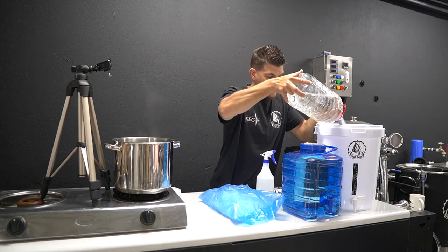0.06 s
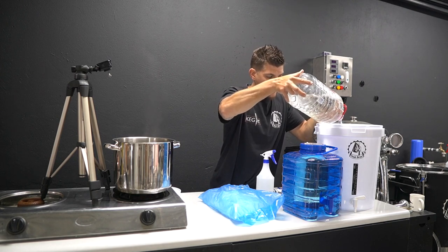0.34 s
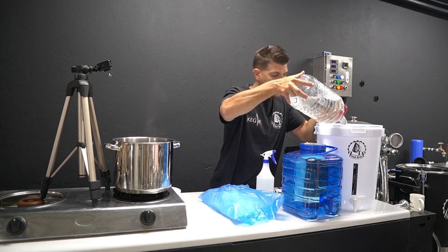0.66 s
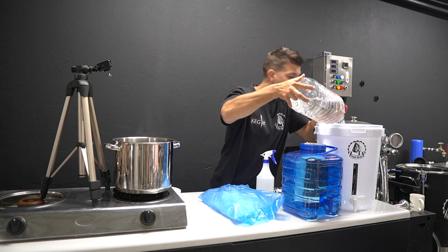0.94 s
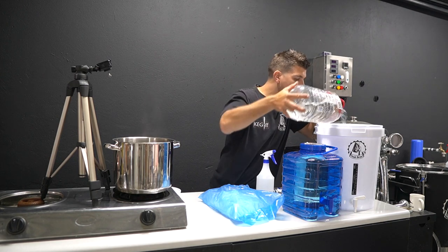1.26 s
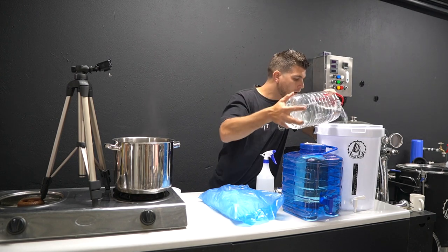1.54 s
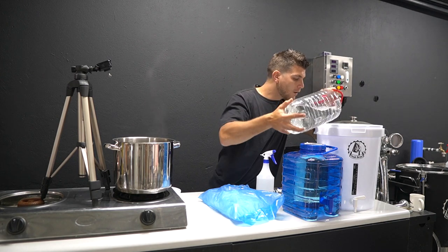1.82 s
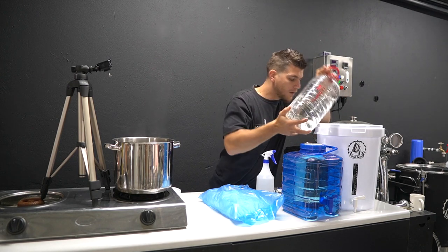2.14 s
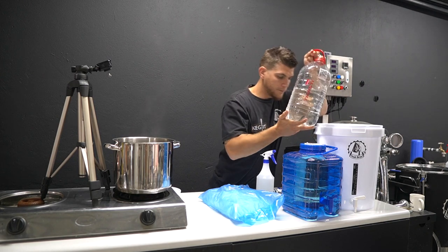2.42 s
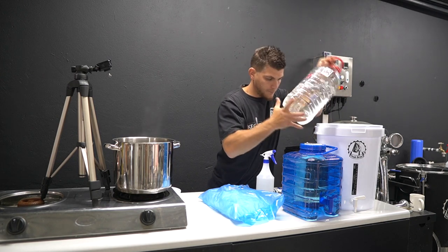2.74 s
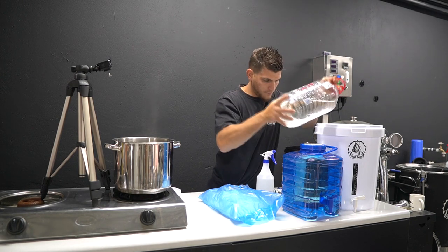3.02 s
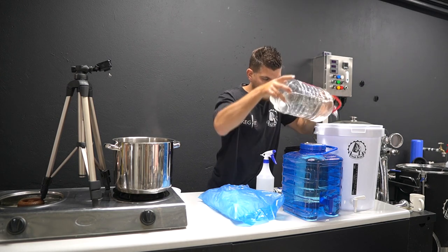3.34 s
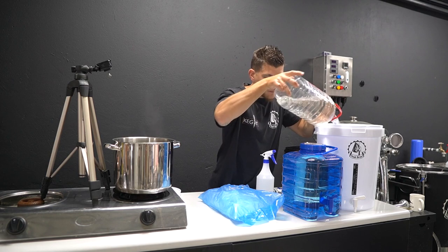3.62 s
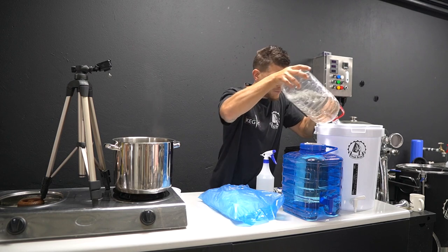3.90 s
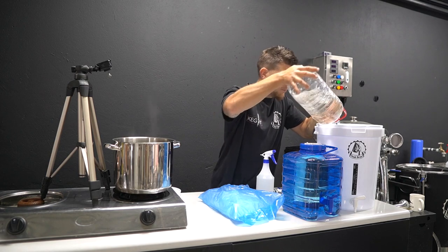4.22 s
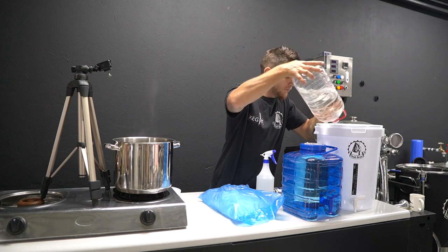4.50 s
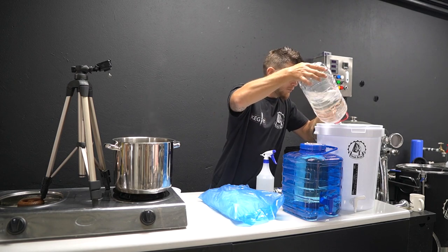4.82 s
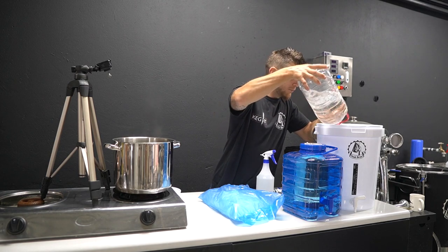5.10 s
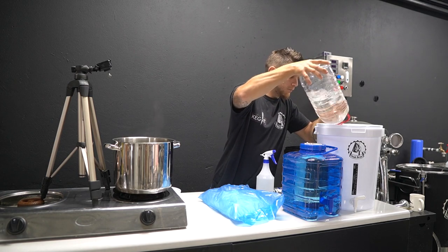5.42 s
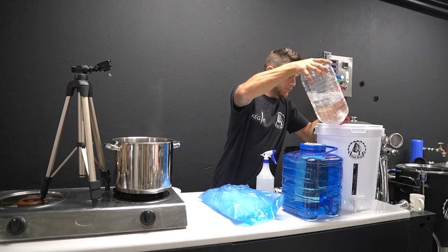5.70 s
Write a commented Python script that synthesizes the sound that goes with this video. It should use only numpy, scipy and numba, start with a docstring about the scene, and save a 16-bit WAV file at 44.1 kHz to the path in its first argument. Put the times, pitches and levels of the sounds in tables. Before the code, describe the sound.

Water pours from the start out of a big thin plastic bottle into a plastic bucket, in about five surges a second, with hollow glugs, bubbling, small plinks and crisp spatter. At 1.6 seconds the bottle wall buckles with a loud, crinkly pop, and the stream stops by about 2 seconds. In the pause, water slops inside the bottle with soft hollow thumps, the clearest slosh coming near 3 seconds. At 3.7 seconds a bright patter of drops and another loud pop open the second pour. The plastic cracks sharply again near 4.9 seconds, and the glugging and splashing continue to the end, near 5.7 seconds. The level dips briefly after each pop. The microphone is near the bucket in a hard-walled room with a short echo. The sound is on the left, over steady low mains hum and faint hiss.

```python
"""A hard-walled room, one microphone near a plastic bucket, heard on the left over mains hum and hiss.
Water pours at once from a big thin plastic bottle, in surges that glug, bubble and spatter. At 1.6 s the
bottle wall buckles with a loud pop; the stream stops and the water slops back inside the bottle.
At 3.7 s a patter of drops and another pop open the second pour, and near 4.9 s the wall cracks again.
A limiter ducks after each pop."""
import sys
import numpy as np
from scipy import signal
from scipy.fft import rfft, irfft
from scipy.io import wavfile
from scipy.ndimage import minimum_filter1d
from numba import njit

SR = 44100
rng = np.random.default_rng(int(sys.argv[2]) if len(sys.argv) > 2 else 0)


def bounce(signal):
    """Save signal as a 16-bit WAV file at the path given by the first command-line argument."""
    frames = np.transpose(np.atleast_2d(signal))
    limited = np.clip(frames, -1, 1)
    pcm = np.round(limited * 32767).astype(np.int16)
    wavfile.write(sys.argv[1], SR, pcm)


N = 253575
TIME, FREQS = np.arange(N) / SR, np.fft.rfftfreq(N, 1 / SR)


def gain_of(db):
    """Decibels to a factor."""
    return 10 ** (np.asarray(db) / 20)


def unit_rms(x):
    """Scales to rms 1."""
    return x / np.sqrt(np.mean(x ** 2) + 1e-20)


def curve(points, hz=FREQS):
    """Joins (Hz, value) points along a log-frequency axis."""
    point_hz, value = np.transpose(points)
    return np.interp(np.log(hz + 1), np.log(point_hz + 1), value)


def add(mix, s, sound):
    """Mixes a sound in at s seconds."""
    part = mix[max(round(s * SR), 0):][:len(sound)]
    part += sound[:len(part)]


def resonances(peaks):
    """Resonance humps in dB over all frequencies."""
    return sum(db / (1 + (2 * (FREQS - hz) / width) ** 2) for hz, width, db in peaks)


def colour(x, db, size=8192):
    """Causal filter with the given dB response: it rings after a click, never before."""
    coarse_db = np.interp(np.fft.rfftfreq(size, 1 / SR), FREQS, np.maximum(db, -100))
    cepstrum = irfft(np.log(gain_of(coarse_db)))
    cepstrum[1:size // 2] *= 2
    cepstrum[size // 2 + 1:] = 0
    return signal.oaconvolve(x, irfft(np.exp(rfft(cepstrum))))[:len(x)]


def lowpass(x, hz, order=2):
    """Dulls the sound above hz."""
    return signal.lfilter(*signal.butter(order, min(hz, SR / 2 - 1), fs=SR), x)


def hump(age, rise_s, fade_s):
    """Envelope that swells smoothly to its peak at age 0, then dies away."""
    return np.exp(-np.where(age < 0, (age / rise_s) ** 2, age / fade_s))


def burst(swell_s, fade_s):
    """Half-second envelope of a splash: a quick swell and an exponential fade."""
    t = np.arange(SR // 2) / SR
    return (1 - np.exp(-t / swell_s)) * np.exp(-t / fade_s)


def bursts(grains, spectrum, rows, swell_s, fade_s):
    """Coloured grains let through in one burst for each (s, dB) row."""
    gate = np.zeros(N)
    for s, db in rows:
        add(gate, s, gain_of(db) * burst(swell_s, fade_s))
    return gate * unit_rms(colour(grains, curve(spectrum)))


# Hum on the microphone line. Each row: multiple of the mains frequency, level in dB.
HUM_HARMONICS = [(1, -13), (2, -54), (3, -52.5), (5, -45.5), (7, -54)]
# The hiss under it. Each row: frequency in Hz, relative level in dB.
HISS_COLOUR = [(47, -33), (80, -22), (109, -61), (197, -28.5), (252, -34), (300, -31.5), (343, -42.5),
               (400, -31.5), (1950, -40), (4410, -40.5), (15500, -60.5)]

def hum_and_hiss(mains_hz=50.083, hiss_db=-43):
    """Mains hum over a faint even hiss, there from the start."""
    hum = sum(gain_of(db) * np.cos(2 * np.pi * k * mains_hz * TIME + k) for k, db in HUM_HARMONICS)
    hiss = unit_rms(colour(rng.standard_normal(N), curve(HISS_COLOUR)))
    return hum + gain_of(hiss_db) * hiss


# The two pours. Each row: start and end in seconds, steady flow in dB, sag in dB per second.
POURS = [(-0.1, 1.872, -34, 0.26), (3.707, 5.8, -30, 2)]

def stream(linger_s, open_db_per_s=468, close_db_per_s=85):
    """The steady stream opens fast, sags as the bottle empties and thins out when it is raised."""
    strength = np.zeros(N)
    for start, end, db, sag in POURS:
        opening = open_db_per_s * np.maximum(start - TIME, 0)
        closing = close_db_per_s * np.maximum(TIME - end - linger_s, 0)
        strength += gain_of(db - sag * (TIME - start) - opening - closing)
    return strength


# Surges at the neck, about five a second. Each row: time in seconds, then gulp, bubbling and spray in dB.
SURGES = [(0.023, -34.5, -32, -28.5), (0.272, -40.5, -26.5, -22.5), (0.453, -38, -27, -27),
          (0.674, -40, -27.5, -29.5), (0.894, -34.5, -27, -26), (1.105, -36.5, -24.5, -24.5),
          (1.277, -40.5, -36, -31), (1.473, -43, -30.5, -24.5), (1.781, -33, -48, -30),
          (3.745, -23, -26.5, -24), (3.82, -31.5, -32, -47), (3.91, -35, -34, -36), (4.018, -43, -26, -28),
          (4.125, -34, -30.5, -39), (4.342, -56, -52, -28.5), (4.451, -55, -29.5, -62),
          (4.555, -43, -27, -35), (4.638, -35, -34, -28.5), (4.904, -40, -24.5, -19),
          (5.049, -48, -28, -30.5), (5.25, -40, -26.5, -28), (5.598, -61, -29, -32),
          (5.725, -26, -27.5, -35)]

def flow(response, column, neck_full_db=-49.5):
    """Drive of one part of the pour: the steady stream plus surges, which need a filled neck."""
    lag_s, rise_s, fade_s, steady_db, surge_db, linger_s = response
    steady = stream(linger_s)
    power = (gain_of(steady_db) * steady) ** 2
    for row in SURGES:
        power += (gain_of(surge_db + row[column]) * hump(TIME - row[0] - lag_s, rise_s, fade_s)) ** 2
    return np.sqrt(power) * np.tanh(steady / gain_of(neck_full_db))


def bubble(hz, cycles, rise):
    """A trapped air pocket rings, rising in pitch as it nears the surface."""
    age = np.arange(int(5 * cycles * SR / hz)) * hz / (SR * cycles)  # in decay times
    return np.exp(-age) * np.sin(2 * np.pi * cycles * age * (1 + rise * age / 2))


def bubbles(low_hz, high_hz, cycles, rise, spread_db, count):
    """A swarm of bubbles of all sizes, a few louder than the rest."""
    swarm = np.zeros(N)
    for when, pitch, ring, loudness in rng.random((count, 4)):
        hz = low_hz * (high_hz / low_hz) ** pitch
        strength = hz * gain_of(-spread_db * np.log(loudness + 0.08))
        add(swarm, when * N / SR, strength * bubble(hz, cycles * (.5 + ring), rise))
    return unit_rms(swarm)


def droplets(per_s, spread_db):
    """Ticks of drops landing at random."""
    size = gain_of(spread_db * np.minimum(rng.exponential(1, N), 5))
    return unit_rms(size * rng.choice([-1, 1], N) * (rng.random(N) < per_s / SR))


def churn(per_s, depth_db):
    """The stream lands in uneven lumps."""
    lumps = rng.standard_normal(1000)
    return gain_of(depth_db * np.interp(TIME * per_s, np.arange(len(lumps)), lumps))


# The three parts of the pour, heard by the bucket. Each row: frequency in Hz, relative level in dB.
GULP_COLOUR = [(65, -16), (110, -6.5), (183, -5.5), (274, -15), (376, -19), (511, -4), (569, -6.5),
               (689, -10.5), (749, -0.5), (800, -10.5), (1040, -27.5), (1760, -120)]
BUBBLING_COLOUR = [(380, -49), (650, -4.5), (900, -6), (1150, -2), (1500, 1), (2000, -4), (2400, -0.5),
                   (3600, -4), (4700, -29), (8000, -100)]
SPRAY_COLOUR = [(1880, -13.5), (3200, -7.5), (4720, -1), (6800, -7), (10800, -22), (14600, -33.5),
                (15500, -46)]
# How each part follows the flow. Each lists: lag, rise and fade of a surge in seconds,
# steady share and surge share in dB, lingering after the pour in seconds.
GULP_RESPONSE = (0.04, 0.08, 0.0457, -8, 4.5, 0.34)
BUBBLING_RESPONSE = (0.037, 0.078, 0.066, 6.5, 5.96, 0.0317)
SPRAY_RESPONSE = (0.049, 0.082, 0.049, 7.6, 4.3, 0.049)
# The air ringing in the bucket. Each row: frequency in Hz, width in Hz, lift in dB.
BUCKET_RESONANCES = [(198, 24, 3.5), (517, 31, 1), (685, 62, -3), (919, 64, 8.5), (1960, 133, 7),
                     (3780, 420, 3)]

def pour():
    """Big air pockets gulp, middling bubbles chatter and drops spray, all inside the ringing bucket."""
    gulp = bubbles(low_hz=130, high_hz=850, cycles=1.7, rise=.04, spread_db=1, count=5000)
    bubbling = bubbles(low_hz=600, high_hz=4000, cycles=5, rise=.035, spread_db=3, count=6500)
    spray = bubbles(low_hz=2800, high_hz=11000, cycles=8, rise=.035, spread_db=3.3, count=6000)
    bubbling += gain_of(-0.5) * droplets(per_s=2900, spread_db=4)
    spray += gain_of(5) * droplets(per_s=4000, spread_db=-1)
    lumps = churn(per_s=55, depth_db=1.42)
    bucket_db = resonances(BUCKET_RESONANCES)
    parts = [(gulp, GULP_COLOUR, flow(GULP_RESPONSE, column=1)),
             (bubbling, BUBBLING_COLOUR, flow(BUBBLING_RESPONSE, column=2)),
             (spray, SPRAY_COLOUR, flow(SPRAY_RESPONSE, column=3))]
    return sum(drive * unit_rms(lumps * colour(grains, curve(spectrum) + bucket_db))
               for grains, spectrum, drive in parts)


# Glugs at the bottle's neck. Each row: start in seconds, level in dB.
GLUGS = [(0.0, -14.5), (0.029, -22), (0.215, -14), (0.446, -19.5), (0.651, -15), (0.861, -12.5),
         (0.882, -15.5), (1.114, -15), (1.484, -17.5), (1.764, -23), (3.801, -19), (4.127, -17),
         (4.554, -12), (4.604, -21), (5.03, -26), (5.252, -21), (5.721, -11)]
# Their hollow tone. Each row: frequency in Hz, relative level in dB.
GLUG_COLOUR = [(90, -19), (180, 4.5), (300, -14.5), (480, 3), (750, -3.5), (1200, -3), (3000, -50)]

def glugs(level_db=2):
    """Each gulp of air back through the neck gives a hollow, quickly damped knock."""
    knocks = bursts(rng.standard_normal(N), GLUG_COLOUR, GLUGS, swell_s=0.0041, fade_s=0.0082)
    return gain_of(level_db) * knocks


# Single bubbles in the bucket. Each row: start in seconds, level in dB, pitch in Hz.
PLINKS = [(0.06, -2, 4400), (0.362, -2, 4630), (0.57, -3.5, 1940), (0.606, -2, 4700), (0.619, -9, 1370),
          (0.847, -11, 5860), (1.149, 1.5, 2760), (1.428, -11.5, 1350), (1.498, -13, 1090),
          (1.687, -7, 6740), (1.951, -8, 7150), (2.991, -33.5, 7400), (3.653, -21, 1720), (3.908, -8, 1020),
          (3.985, -6.5, 1510), (4.009, -11, 1060), (4.055, -12.5, 764), (4.149, -4.5, 1550),
          (4.256, -6, 1576), (4.368, -7, 3060), (4.394, -2, 2790), (4.448, -13.5, 760), (4.57, -3.5, 2100),
          (4.592, -4, 2390), (4.662, -2, 2570), (4.817, -11, 1216), (5.216, -8, 1860), (5.276, -14, 1660),
          (5.674, -9.5, 1310)]

def plinks(swell_s=0.0002):
    """Single bubbles ring out above the swarm, each with one short rising note."""
    notes = np.zeros(N)
    for s, db, hz in PLINKS:
        note = bubble(hz, cycles=6, rise=0.034)
        onset = 1 - np.exp(-np.arange(len(note)) / (swell_s * SR))
        add(notes, s, gain_of(db) * onset * note)
    return notes


# Gobs hitting the water in the bucket. Each row: start in seconds, slap in dB, spatter in dB.
GOBS = [(0.066, -18, -11), (0.268, -30, -22), (0.361, -37, -14), (0.449, -24, -14.5), (0.531, -41, -16),
        (0.603, -19, -13.5), (0.701, -16, -16.5), (0.75, -41, -18.5), (0.862, -43, -46), (0.898, -27, -17),
        (0.928, -16, -17.5), (1.126, -15, -11.5), (1.148, -11, -29), (1.307, -17, -12), (1.444, -15, -19),
        (1.493, -14, -15), (1.638, -11, -12.5), (1.804, -11.5, -16), (1.877, -31, -18), (3.641, -39, -29.5),
        (3.945, -19, -11.5), (4.055, -19, -18), (4.142, -13, -30), (4.171, -31, -12), (4.36, -14.5, -12),
        (4.564, -29, -18), (4.608, -16.5, -16.5), (4.633, -11.5, -12), (4.659, -16.5, -14),
        (4.834, -7.5, -11), (5.145, -17.5, -19), (5.251, -23, -26), (5.424, -18, -17), (5.583, -34, -22),
        (5.73, -29, -17.5)]
# The tone of the slap and of the spatter. Each row: frequency in Hz, relative level in dB.
SLAP_COLOUR = [(200, -23.5), (600, -9), (1000, -4), (1900, 2), (3000, -2), (4500, -15.5), (9000, -60)]
SPATTER_COLOUR = [(1000, -44), (3000, 3), (5000, 4), (7500, -1.5), (10500, -15.5), (15000, -28.5)]

def gobs(level_db=2):
    """Each gob gives a short wet slap and throws a crisp spatter of drops."""
    slaps = bursts(droplets(per_s=6000, spread_db=1), SLAP_COLOUR,
                   [(s, db) for s, db, _ in GOBS], swell_s=0.0029, fade_s=0.013)
    spatter = bursts(droplets(per_s=1900, spread_db=2.5), SPATTER_COLOUR,
                     [(s, db) for s, _, db in GOBS], swell_s=0.003, fade_s=0.011)
    return gain_of(level_db) * (slaps + spatter)


# Large air pockets entering the bottle. Each row: time of the peak in seconds, level in dB, pitch in Hz.
BOOMS = [(0.121, -38, 175), (0.261, -35.5, 180), (0.369, -32, 185), (0.472, -29, 176), (0.695, -41, 182),
         (0.81, -35, 185), (0.891, -32, 181), (1.127, -29, 182), (1.222, -33, 189), (1.513, -31, 184),
         (1.605, -32.5, 202), (3.691, -37, 178), (3.795, -28, 184), (3.888, -37, 169), (4.013, -35, 188),
         (4.148, -40, 163), (4.438, -38.5, 185), (4.514, -36.5, 168), (4.707, -36, 182), (4.92, -32.5, 185),
         (5.289, -35, 194), (5.453, -36, 181), (5.541, -31, 194), (5.649, -31.5, 186)]

def booms(level_db=2, glide_hz_per_s=120):
    """The air in the bottle bounces on the water: a soft, round low note that creeps upward."""
    notes, age = np.zeros(N), np.arange(-.1, .2, 1 / SR)
    envelope = hump(age, rise_s=0.027, fade_s=0.03)
    for s, db, hz in BOOMS:
        tone = np.sin(2 * np.pi * (hz + glide_hz_per_s * age / 2) * age)
        add(notes, s + age[0], gain_of(db + level_db) * envelope * tone)
    return notes


# The bottle buckling. Each row: start in seconds, level in dB, treble corner in Hz, crinkle in dB,
# crinkle fade in seconds, pitch of the flipping panel in Hz, wall ring in dB, crack in dB.
POPS = [(1.5716, 1.5, 4400, 3, 0.055, 1610, 0.5, -1), (3.7153, 2.5, 5640, -0.5, 0.08, 1920, 0, 0),
        (4.8831, -1, 4800, 1, 0.011, 596, -4, 5), (4.8875, 1, 15000, 0.5, 0.024, 5680, -6, 6)]
# Modes of its wall. Each row: frequency in Hz, level in dB, seconds to fall by 60 dB.
WALL_MODES = [(714, -15, 0.015), (843, -14, 0.15), (1530, -6, 0.036), (1673, 3, 0.032), (1923, -3, 0.031),
              (2400, -1.5, 0.0095), (2430, -2.5, 0.023), (3340, -4.5, 0.0082), (3600, -1.5, 0.0082),
              (6000, 3, 0.0071)]

def pops(crinkle_swell_s=0.0053, crack_s=0.0011, low_cut_hz=750):
    """The thin wall snaps through with a crack: a panel knocks, the wall rings, the ribs crinkle."""
    snaps, t = np.zeros(N), np.arange(SR // 4) / SR
    wall = sum((-1) ** k * gain_of(db - 60 * t / t60) * np.sin(2 * np.pi * hz * t)
               for k, (hz, db, t60) in enumerate(WALL_MODES))
    panel_fade = gain_of(6) * np.exp(-t / 0.0013) + gain_of(-20) * np.exp(-t / 0.021)  # knock, faint tail
    for s, db, corner_hz, crinkle_db, crinkle_s, panel_hz, ring_db, crack_db in POPS:
        ring = gain_of(ring_db) * wall + panel_fade * np.sin(2 * np.pi * panel_hz * t)
        noise = rng.standard_normal(len(t))
        ribs = lowpass(noise - lowpass(noise, 1500, order=1), 4900)  # too small to move much bass
        crinkle = gain_of(crinkle_db) * (1 - np.exp(-t / crinkle_swell_s)) * np.exp(-t / crinkle_s) * ribs
        crack_noise = lowpass(rng.standard_normal(len(t)), 9000, order=1)
        crack = gain_of(crack_db) * np.exp(-t / crack_s) * crack_noise
        add(snaps, s, gain_of(db) * lowpass(ring + crack + crinkle, corner_hz, order=10))
    return signal.lfilter(*signal.butter(3, low_cut_hz, "high", fs=SR), snaps)


# Thumps inside the bottle between the pours. Each row: start in seconds, level in dB,
# treble corner in Hz, hollow note in dB, its pitch in Hz.
THUMPS = [(2.079, -33.5, 460, -37, 129), (2.975, -21.5, 2280, -31, 137.5), (3.115, -33, 770, -50, 180),
          (3.272, -33.5, 1510, -54, 178)]
# The bottle's hollow body. Each row: frequency in Hz, width in Hz, lift in dB.
BOTTLE_RESONANCES = [(181, 43, 6.5), (323, 86, -4), (520, 150, 5.5), (1680, 340, 6.5)]

def thumps(slap_db=1, slap_s=0.008, fade_s=0.049):
    """Water slops back and slaps into the bottle's end, which answers with a hollow note."""
    knocks, notes, t = np.zeros(N), np.zeros(N), np.arange(SR // 2) / SR
    blow = gain_of(slap_db) * np.exp(-t / slap_s) + np.exp(-t / fade_s)
    for s, db, corner_hz, note_db, note_hz in THUMPS:
        add(knocks, s, gain_of(db) * blow * unit_rms(lowpass(rng.standard_normal(len(t)), corner_hz)))
        note = burst(swell_s=0.006, fade_s=0.12) * np.sin(2 * np.pi * note_hz * t)
        add(notes, s, gain_of(note_db) * note)
    body_db = resonances(BOTTLE_RESONANCES) + curve([(50, -80), (120, -2), (800, -4.5)])
    return notes + colour(knocks, body_db)


# The swell of water running along the bottle, and its soft laps. Each row: time in seconds, level in dB.
SLOSH_LEVELS = [(2.68, -45), (2.745, -41), (2.825, -40), (2.9, -27.5), (2.93, -26), (2.98, -26.5),
                (3.12, -45.5), (3.3, -60.5), (3.55, -63)]
LAPS = [(2.715, -32.5), (3.0, -35)]
# The tone of each. Each row: frequency in Hz, relative level in dB.
SLOSH_COLOUR = [(150, -29.5), (300, -4), (540, 4), (1500, 0), (4000, 0), (9000, -8), (15000, -36)]
LAP_COLOUR = [(400, -15), (900, -0.5), (1300, 2), (2000, -5), (5000, -38), (12000, -51)]

def slosh(running_db=-3):
    """The bottle tips forward again: water runs along it and laps against the wall."""
    froth = bubbles(low_hz=400, high_hz=3000, cycles=5, rise=.03, spread_db=2, count=1800)
    grains = droplets(per_s=2800, spread_db=2) + gain_of(-23) * froth
    times, db = np.transpose(SLOSH_LEVELS)
    swell = gain_of(running_db + np.interp(TIME, times, db, left=-np.inf, right=-np.inf))
    running = swell * unit_rms(colour(grains, curve(SLOSH_COLOUR)))
    return running + bursts(grains, LAP_COLOUR, LAPS, swell_s=0.021, fade_s=0.059)


def first_drops(start_s=3.679, level_db=-18):
    """The first drops of the second pour patter brightly ahead of the stream."""
    bright = [(300, 3), (2000, -17), (5000, 4.5), (9000, -4), (12000, -16), (15000, -27)]  # Hz, dB
    ticks = droplets(per_s=4700, spread_db=3)
    return bursts(ticks, bright, [(start_s, level_db)], swell_s=0.007, fade_s=0.03)


def echo_tail(t60s, seconds):
    """Sparse echoes of random sign, each band dying at its own speed; energy 1."""
    taps = (rng.standard_normal(SR) * (rng.random(SR) < .25))[:int(seconds * SR)]
    hz, t, bands = signal.stft(taps, SR, nperseg=256)
    decay = gain_of(-60 * t / curve(t60s, hz)[:, None])
    echoes = signal.istft(bands * decay, SR, nperseg=256)[1]
    return echoes / np.linalg.norm(echoes)


def echo(x, t60s, seconds, hop):
    """The splash point wanders, so every hop samples a new echo pattern fades in at equal power."""
    echoes, padded = np.zeros(N + hop), np.pad(x, (hop, 2 * hop))
    window = np.sin(np.pi * np.arange(2 * hop) / (2 * hop))
    for at in range(0, N + hop, hop):
        add(echoes, at / SR, signal.fftconvolve(window * padded[at:at + 2 * hop], echo_tail(t60s, seconds)))
    return echoes[hop:]


# The room around the microphone. Each row: frequency in Hz, seconds to fall by 60 dB.
ROOM_DECAY = [(150, 0.92), (600, 0.86), (2000, 0.77), (5000, 0.75), (12000, 0.65)]

def room(x, delay_s=0.006):
    """The hard walls ring on, reaching the microphone just after the direct sound."""
    reverb = np.zeros(N)
    add(reverb, delay_s, echo(x, ROOM_DECAY, seconds=0.92, hop=8192))
    return reverb


def scene():
    """At the microphone: water echoing briefly in the bucket, the bottle, and the room behind both."""
    water = pour() + gobs() + plinks() + glugs() + first_drops()
    bucket_echo = echo(water, t60s=[(300, 0.1), (8000, 0.071)], seconds=.1, hop=2048)
    water = gain_of(-2) * water + gain_of(-8) * bucket_echo
    snaps, slop, air = pops(), slosh() + thumps(), booms()
    direct = water + snaps + air + gain_of(-0.5) * slop
    dull_snaps = lowpass(snaps, 9300, order=3)  # the room swallows the top of the cracks
    reverb = room(gain_of(-6.5) * (water + slop) + gain_of(-7) * (dull_snaps + air))
    return np.array([direct + gain_of(-1.5) * reverb + hum_and_hiss()] * 2)


@njit
def gain_reduction(over_db, attack_s, release_db_per_s, start_db):
    """Reduction in dB: it closes in on each excess and then lets go at a steady rate."""
    attack, release = 1 / (attack_s * SR), release_db_per_s / SR
    reduction, held = np.zeros(len(over_db)), start_db
    for i, over in enumerate(over_db):
        held = held + (over - held) * attack if over > held else max(held - release, 0.)
        reduction[i] = held
    return reduction


def record(dry, input_db=6, threshold_db=-6, leak_db=-52, right_hiss_db=-68.5, top_hz=15550):
    """Microphone to the left channel: slow gain rider, fast limiter, overload, then the band limit."""
    mic = gain_of(input_db) * dry[0]
    peak = -minimum_filter1d(-abs(mic), size=45, origin=22)  # held for a millisecond
    over_db = np.maximum(20 * np.log10(peak + 1e-9) - threshold_db, 0)
    rider_db = gain_reduction(over_db, attack_s=0.13, release_db_per_s=1.32, start_db=8.0)
    still_over_db = np.maximum(over_db - rider_db, 0)
    limiter_db = gain_reduction(still_over_db, attack_s=0.0016, release_db_per_s=420, start_db=0.0)
    left = np.clip(mic * gain_of(-rider_db - limiter_db), -1, 1)
    right = gain_of(leak_db) * left + gain_of(right_hiss_db) * rng.standard_normal(N)
    band_limit = signal.firwin(511, top_hz, window=("kaiser", 9), fs=SR)
    return signal.oaconvolve(np.array([left, right]), band_limit[None], "same")


dry = scene()
out = record(dry)
bounce(out)
```